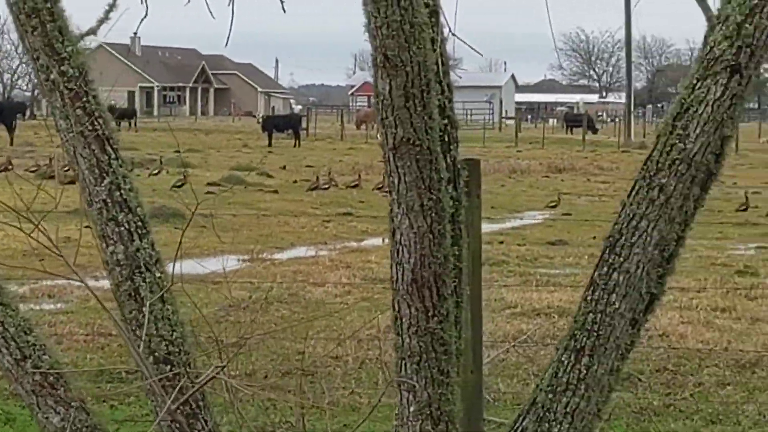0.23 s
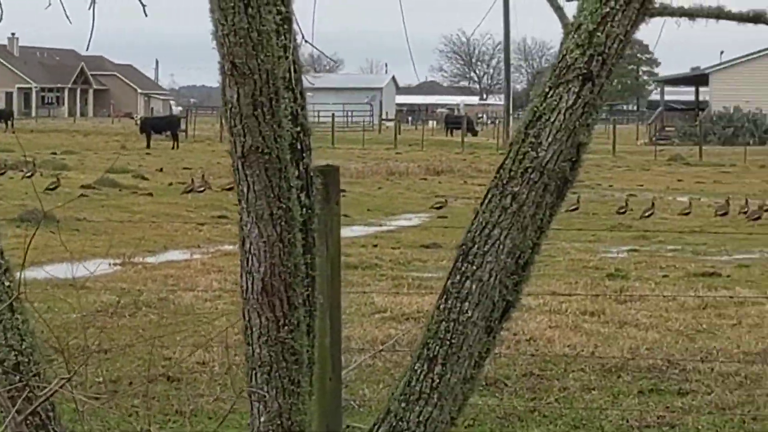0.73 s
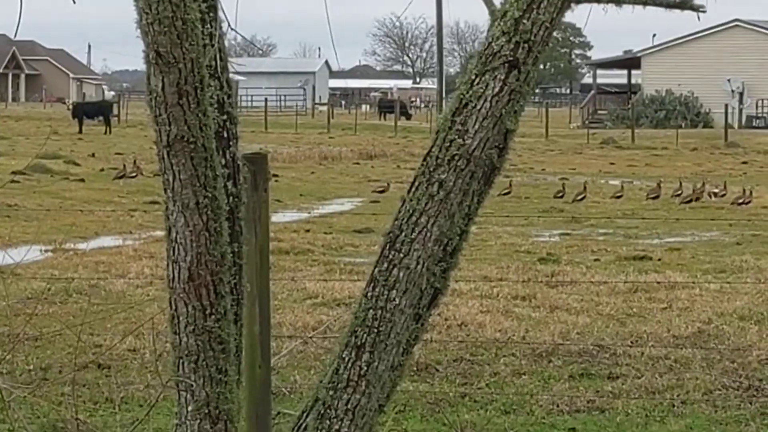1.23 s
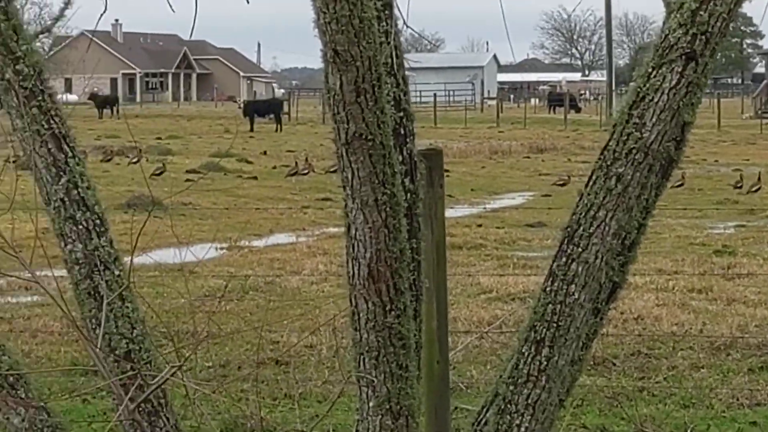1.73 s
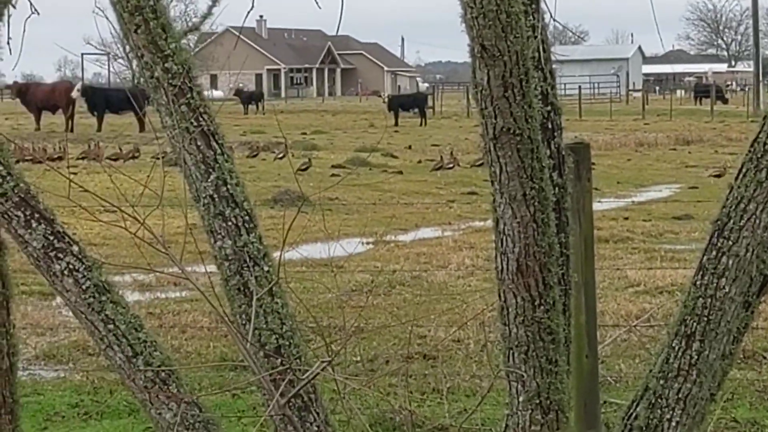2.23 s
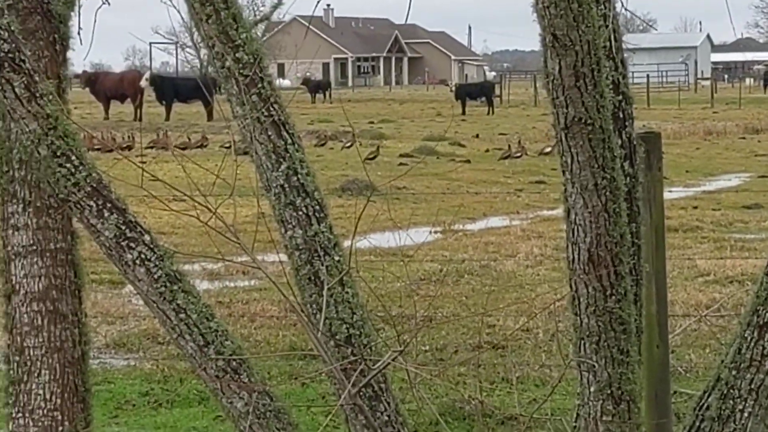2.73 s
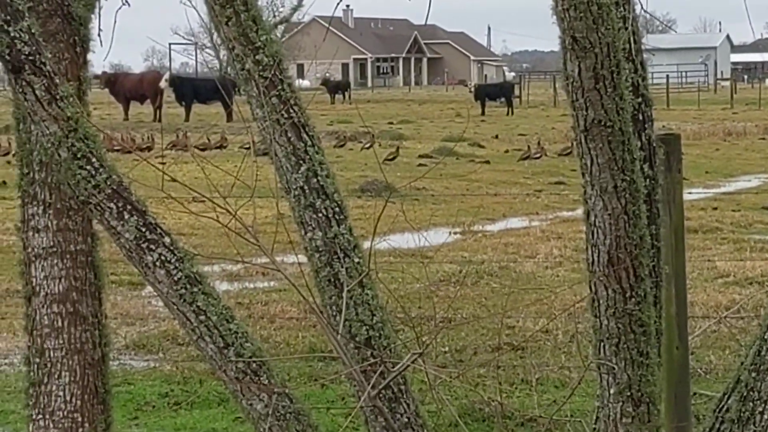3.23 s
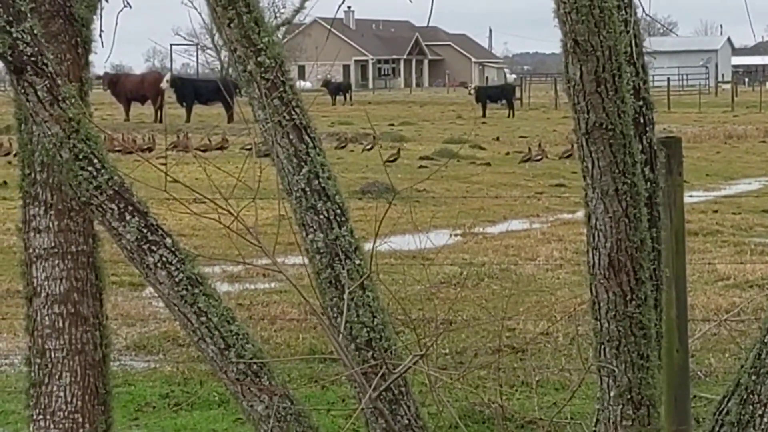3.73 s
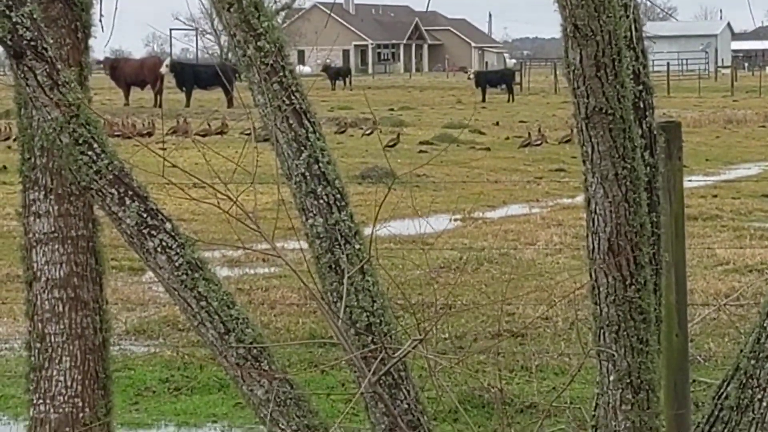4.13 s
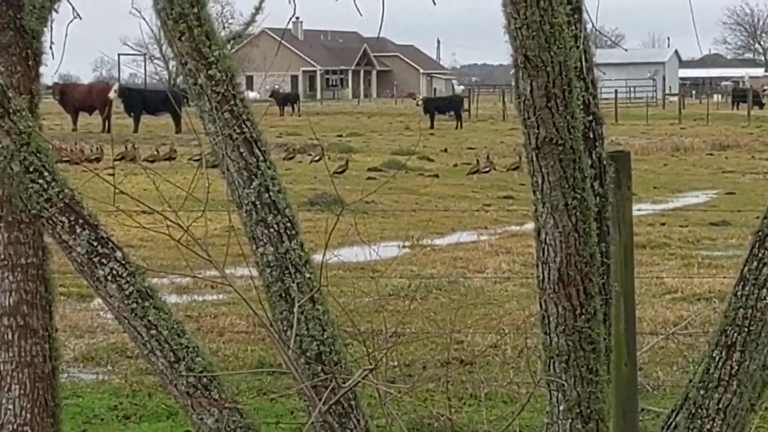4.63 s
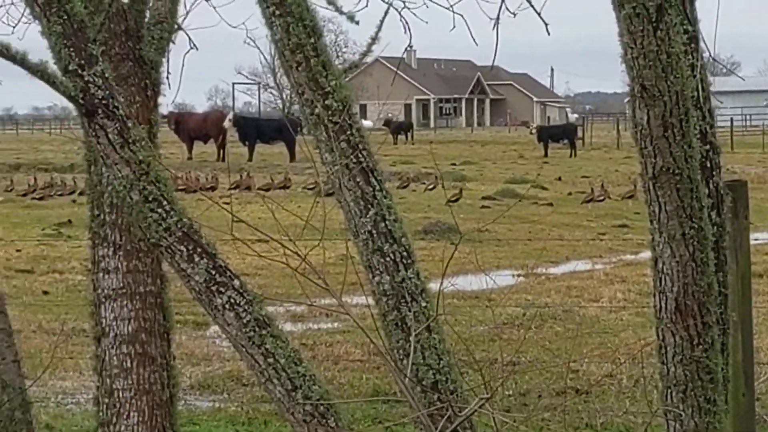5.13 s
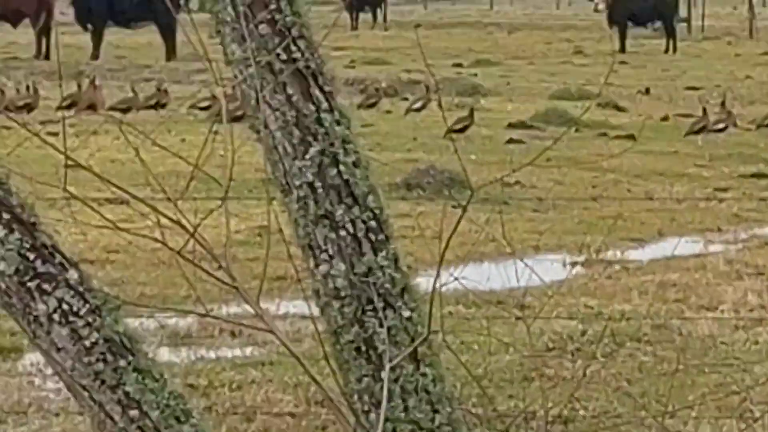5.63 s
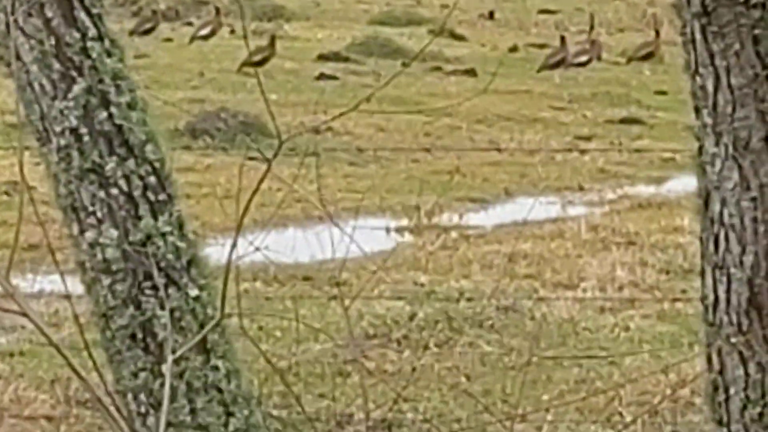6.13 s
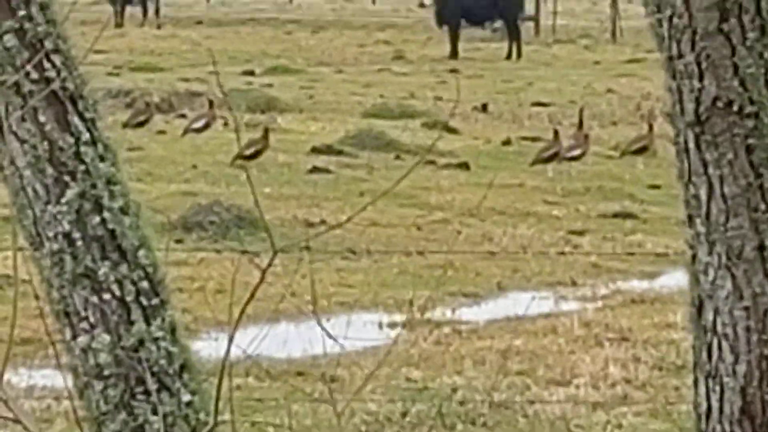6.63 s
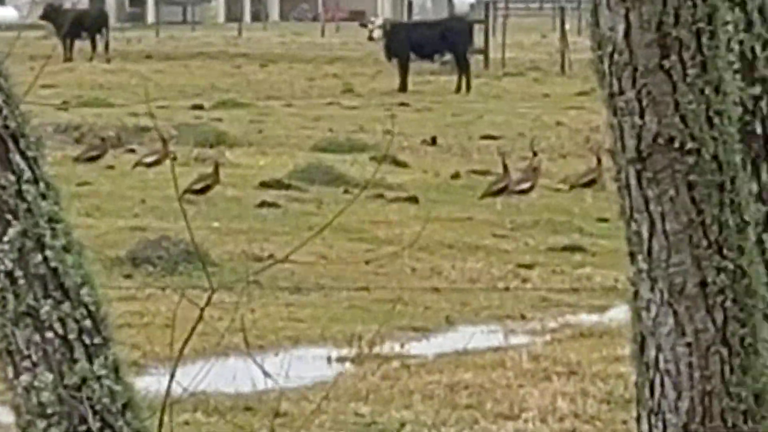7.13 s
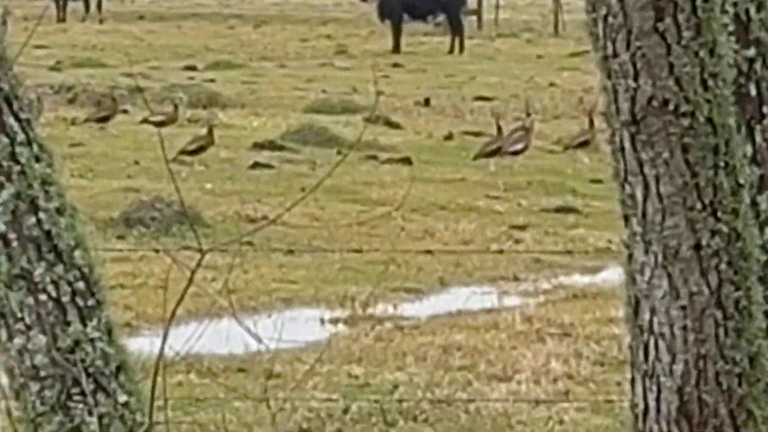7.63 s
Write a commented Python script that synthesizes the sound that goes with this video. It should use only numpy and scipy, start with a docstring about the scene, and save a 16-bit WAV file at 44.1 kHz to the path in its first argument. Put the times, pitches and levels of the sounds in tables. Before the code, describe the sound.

Small birds chirp, whistle and warble faintly across an open pasture, with a slight echo, while a cricket trills thin and high over a soft rumble and hum. A few small ticks sound close by in the first half second, and dry, leafy rustles follow on the right between about 1 and 3.5 seconds. From around 3.4 seconds wind begins to buffet the microphone, with low, uneven thumps on either side, strongest from 4.4 to 6.9 seconds. The cricket grows a little louder after 4 seconds, and distant ducks whistle among the scattered chirps. At about 6.6 seconds the calls start to crowd together and rise in level. From 7.5 seconds the flock bursts into alarm, many loud, shrill, wavering whistles overlapping above an airy rush of wings, lasting until the end at about 8 seconds.

```python
"""Small birds and whistling ducks call near and far across a wet pasture, heard through a hand-held camera.
Their notes are wavering tones that glide, arch, warble or sound two voices at once, and echo off trees
and sheds. A cricket trills with its wings, something rustles close on the right, and wind eddies thump
on the two microphone ports over a faint hum and rumble. At the end the flock raises the alarm:
many whistles at once over a rush of wings."""
import sys
import numpy as np
from scipy import signal
from scipy.fft import rfft, irfft, next_fast_len
from scipy.io import wavfile
from scipy.ndimage import map_coordinates

SR = 44100
rng = np.random.default_rng(int(sys.argv[2]) if len(sys.argv) > 2 else 0)


def unload_wav(signal):
    """Save mono or channel-first audio to the path in sys.argv[1] as 16-bit WAV at rate SR, clipped to [-1, 1]."""
    wavfile.write(
        sys.argv[1],
        SR,
        np.round(np.clip(np.atleast_2d(signal).T, -1, 1) * 32767).astype(np.int16),
    )


N = 348390
FLOCK_LAG_S, CHIRP_LAG_S = -0.000295, 0.00031  # left-port delay: flock on the left, chirper on the right


def amp(db):
    """Gain of a level in dB."""
    return 10 ** (np.asarray(db) / 20)


def unit(x):
    """Scaled to rms 1."""
    return x / np.sqrt(np.mean(x ** 2) + 1e-20)


def along(points, hz):
    """Read (frequency, value) breakpoints on a log frequency axis."""
    freqs, values = np.transpose(points)
    return np.interp(np.log(hz + 1), np.log(freqs + 1), values)


def automation(rows):
    """One fader curve, sample by sample, for each column after the time."""
    times, *columns = np.transpose(rows)
    return [np.interp(np.arange(N) / SR, times, column) for column in columns]


def wobble(rate):
    """Smooth random modulation, rate knots a second."""
    return map_coordinates(rng.standard_normal(int(N * rate / SR) + 4), [np.arange(N) * rate / SR])


def eq(x, response):
    """Shape x with a gain that depends on frequency."""
    size = next_fast_len(N + 8192)
    return irfft(rfft(x, size) * response(np.fft.rfftfreq(size, 1 / SR)), size)[..., :N]


def hiss(spectrum, shared, grain_db, rate=400):
    """Stereo noise of rms 1, partly common to both sides, lumpy by grain_db at rate lumps a second."""
    noise = np.sqrt(shared) * rng.standard_normal(N) + np.sqrt(1 - shared) * rng.standard_normal((2, N))
    lumps = amp(grain_db * np.array([wobble(rate), wobble(rate)]))
    return unit(eq(noise * lumps, lambda hz: amp(along(spectrum, hz))))


def pan(pan_db):
    """Constant-power gains; every pan is left minus right in dB, so positive is left."""
    turn = np.arctan(amp(-pan_db))
    return np.array([[np.cos(turn)], [np.sin(turn)]])


def bend(length, start, middle, end):
    """A parabola through three points, lasting length seconds."""
    u = np.linspace(-1, 1, round(length * SR))
    return middle + u * (end - start) / 2 + u * u * ((end + start) / 2 - middle)


def add_note(out, start, hz, db, pan_db, fade, harmonics_db=-60, lag_s=FLOCK_LAG_S, waver_hz=42):
    """Mix in a hoarse, wavering tone that follows hz; fade is the share of its length at each end."""
    u = np.linspace(0, 1, len(hz))
    envelope = np.sin(np.pi / 2 * np.clip(np.minimum(u, 1 - u) / fade, 0, 1))
    knots = rng.standard_normal((3, 64))
    t = np.arange(len(hz)) / SR
    jitter, flutter, waver = [np.interp(t * rate, np.arange(64), row)
                              for rate, row in zip((250, 250, 70), knots)]
    port_phase = (lag_s + 0.000015 * knots[1, 0]) * np.array([[-np.pi], [np.pi]]) * hz
    phase = 2 * np.pi * np.cumsum(hz + 50 * jitter + waver_hz * waver) / SR + 9 * knots[0, 0] + port_phase
    tone = np.sin(phase)
    if hz.max() < 6100:
        tone += amp(harmonics_db) * (np.sin(2 * phase) + 0.44 * np.sin(3 * phase))
    note = pan(pan_db) * amp(db + 3.5 * flutter) * envelope * tone
    slot = out[:, round(start * SR):][:, :len(hz)]
    slot += note[:, :slot.shape[1]]


# Reverb decay of the pasture: (frequency [Hz], time to fall 60 dB [s])
FIELD_DECAY = [(2000, 0.089), (5000, 0.49), (12000, 0.19)]


def echoes(x):
    """Reflections off trees and sheds: a noise tail in which each frequency dies at its own speed."""
    hz, t, bands = signal.stft(rng.standard_normal((2, SR // 2)), SR, nperseg=256)
    tail = signal.istft(bands * amp(-60 * t / along(FIELD_DECAY, hz)[:, None]), SR, nperseg=256)[1]
    return signal.fftconvolve(x, tail / np.linalg.norm(tail[0]), axes=1)[:, :N]


# Tone colour of the ambience bed: (frequency [Hz], level [dB])
AIR_SPECTRUM = [(15, -46), (30, -10), (75, 2), (135, -3), (260, -12.5), (750, -17), (1200, -22.5),
                (2400, -27.5), (3600, -16.5), (4300, -39), (5700, -15.5), (6760, -6.5), (8400, -29.5),
                (11600, -27.5), (13200, -16.5), (15600, -38)]
# Faders of the distant drone: (time [s], hum level [dB], midrange boost [dB])
DRONE_FADERS = [(0, -64.5, 3.5), (1.5, -69, 3.5), (3.2, -67.5, 1.5), (4.2, -75, 5.5), (7, -80, 6),
                (7.9, -75, 9.5)]


def air():
    """The open field: a faint low hum, and a bed of far rumble and hiss whose mids swell slowly."""
    hum_db, boost_db = automation(DRONE_FADERS)
    hum = amp(hum_db + 2.9 * wobble(39)) * np.sin(2 * np.pi * np.cumsum(140 + 5 * wobble(9.5)) / SR)
    bed = amp(-63.5 + 1.1 * wobble(9.2)) * hiss(AIR_SPECTRUM, shared=0.12, grain_db=2.0)
    mids = eq(bed, lambda hz: np.exp(-np.log((hz + 1) / 900) ** 2 / 3.1))
    return hum + bed + (amp(boost_db) - 1) * mids


# Breeze on the microphone ports: (time [s], left level [dB], right level [dB])
BREEZE_FADERS = [(0, -60.5, -61), (2.9, -64, -64), (3.2, -55, -57.5), (3.5, -47.5, -47), (3.95, -57, -48.5),
                 (4.1, -35.5, -46), (4.4, -48, -42), (5.0, -41, -36.5), (5.1, -46, -46), (5.2, -34.5, -47),
                 (5.55, -48.5, -46.5), (5.9, -48, -37), (6.15, -40, -38), (6.3, -49, -44.5),
                 (6.5, -41.5, -33.5), (6.9, -49.5, -40.5), (7.4, -46.5, -46.5), (7.9, -50.5, -40)]
# Sudden gusts: (centre time [s], length [s], peak level [dB], port [0 left, 1 right])
PORT_GUSTS = [(3.435, 0.026, -33, 0), (3.511, 0.021, -39.5, 0), (3.62, 0.04, -40, 0),
              (3.858, 0.072, -36, 1), (4.0, 0.066, -40, 1), (4.164, 0.041, -34.5, 0),
              (4.21, 0.076, -37.5, 1), (4.296, 0.21, -33, 0), (4.457, 0.056, -22.5, 1),
              (4.628, 0.092, -36.5, 0), (4.766, 0.095, -33.5, 0), (4.943, 0.061, -37, 0),
              (4.965, 0.13, -33.5, 1), (5.322, 0.033, -33, 0), (5.536, 0.18, -34.5, 0),
              (5.579, 0.085, -31, 1), (5.69, 0.092, -24, 1), (5.827, 0.071, -34, 0), (5.952, 0.11, -23, 1),
              (6.157, 0.03, -25, 1), (6.222, 0.033, -28.5, 1), (6.426, 0.028, -31, 0),
              (6.531, 0.062, -27, 1), (6.638, 0.042, -30.5, 1), (6.818, 0.2, -37, 1),
              (7.057, 0.058, -34, 1), (7.179, 0.021, -33, 1), (7.4, 0.023, -40.5, 0),
              (7.604, 0.077, -35, 1), (7.798, 0.041, -33, 1)]
# Tone colour of the buffeting: (frequency [Hz], level [dB])
BUFFET_SPECTRUM = [(15, -65), (25, -29), (82, 0.5), (115, 1.5), (223, -10), (320, -18.5), (450, -34),
                   (650, -46.5), (1000, -100)]


def wind():
    """Eddies thump on each port separately: an unsteady breeze and gusts, brighter when strong."""
    swing_db, gust_edge_db, gust_flatness = 2.5, 7.5, 2.5
    t = np.arange(N) / SR
    power = amp(np.array(automation(BREEZE_FADERS)) + swing_db * np.array([wobble(18), wobble(17)])) ** 2
    for centre, length, peak_db, port in PORT_GUSTS:
        span = slice(round((centre - length) * SR), round((centre + length) * SR))
        drop_db = gust_edge_db * np.abs(2 * (t[span] - centre) / length) ** gust_flatness
        power[int(port), span] += amp(peak_db - drop_db) ** 2
    db = 10 * np.log10(power)
    buffet = amp(db) * hiss(BUFFET_SPECTRUM, shared=0, grain_db=4.0, rate=45)
    expanded = buffet * amp(0.9 * (db + 29.5))
    mids = eq(expanded, lambda hz: hz ** 4 / (hz ** 4 + 200 ** 4) / (1 + (hz / 600) ** 8))
    lows = eq(buffet, lambda hz: 200 ** 4 / (hz ** 4 + 200 ** 4) * hz ** 2 / (hz ** 2 + 45 ** 2))
    return lows + mids


# How the two ports pull each pitch to one side: (frequency [Hz], pan [dB])
PORT_BIAS = [(2900, -8), (3900, -6.5), (5200, 5.5), (6700, 7.5), (9000, -2.5)]


def chorus(centre_hz, spread, slide, count, longest_s=0.0792, start=0, harmonics_db=-60, waver_hz=40):
    """Many birds at once: gliding or arching notes at random moments from start on, at rms 1."""
    out = np.zeros((2, N))
    for when, pitch, duration, arch, fall, softness, side in rng.random((count, 7)):
        hz = centre_hz * np.exp(spread * (2 * pitch - 1))
        length = 0.0201 + (longest_s - 0.02) * duration
        contour = bend(length, hz * (1 - slide * (1.4 * arch - 0.6)), hz, hz * (1 - slide * (fall - 0.2)))
        pan_db = along(PORT_BIAS, hz) + 8 * (side - 0.5)
        add_note(out, start + when * (N / SR - start), contour, -12 * softness, pan_db,
                 fade=0.4, harmonics_db=harmonics_db, waver_hz=waver_hz)
    return out / np.std(out[:, round(start * SR):])


# Faders of the background calls: (time [s], duck level [dB], songbird level [dB])
FLOCK_FADERS = [(0, -83, -51), (1.14, -92, -56.5), (1.6, -76, -50), (2.8, -75, -56), (3.87, -79.5, -108),
                (4.27, -61.5, -49), (4.5, -79.5, -67), (4.95, -63, -94), (5.3, -73.5, -53.5),
                (6.1, -62.5, -52), (6.4, -68, -57), (7.2, -59.5, -46), (7.9, -39.5, -49)]


def far_flock():
    """Distant ducks and songbirds, heard mostly through their echoes."""
    ducks_db, songbirds_db = automation(FLOCK_FADERS)
    calls = amp(ducks_db - 0.5) * chorus(3900, spread=0.24, slide=0.132, count=620)
    calls += amp(songbirds_db - 8.5) * chorus(6700, spread=0.1, slide=0.0646, count=450)
    return amp(-8) * calls + echoes(calls)


# Faders of the trill: (time [s], song level [dB], overtone level [dB])
CRICKET_FADERS = [(0, -59, -76), (2.2, -65, -76), (2.7, -56.5, -76), (3.8, -61.5, -96), (4.3, -50.5, -72.5),
                  (6.5, -51, -74), (7.9, -47.5, -70.5)]


def cricket():
    """Each wing stroke sounds a rising tone with its overtone; a fainter tone trails the stroke."""
    song_hz, trailing_hz, strokes_per_s = 6650, 12300, 45.751
    song_db, overtone_db = automation(CRICKET_FADERS)
    t = np.arange(N) / SR
    strokes = strokes_per_s * t + 0.29

    def gate(lag, duty):
        return np.clip(1.5 - 3 * np.abs((strokes - lag + 0.5) % 1 - 0.5) / duty, 0, 1)

    phase = 2 * np.pi * np.cumsum(song_hz + 70 * wobble(200) + 100 * np.sin(2 * np.pi * strokes)) / SR
    song = amp(song_db + 3.5 + 3 * wobble(40)) * gate(0, duty=0.58) * np.sin(phase)
    overtone = amp(3.5 * wobble(150)) * gate(0, duty=0.45) * np.sin(2 * phase)
    trailing = amp(-6 + 2.3 * wobble(40)) * gate(0.28, duty=0.31) * np.sin(2 * np.pi * trailing_hz * t)
    return pan(11) * song + pan(-12) * amp(overtone_db + 11) * (overtone + trailing)


# Dry scrapes: (time [s], length [s], level [dB], dull layer amount [0-1])
SCRAPES = [(0.007, 0.7, -69, 0.17), (1.122, 0.16, -61, 0.16), (1.238, 0.19, -70, 0.05),
           (1.432, 0.13, -53.5, 0.18), (1.543, 0.2, -53.5, 0.27), (1.721, 0.15, -50, 0.2),
           (1.807, 0.41, -66, 0.32), (2.044, 0.36, -66.5, 0.2), (2.587, 0.16, -55.5, 0.08),
           (3.392, 0.11, -61.5, 0.2), (3.493, 0.09, -61, 0.13), (4.217, 0.1, -67.5, 1),
           (4.38, 0.14, -72.5, 0.7), (6.545, 0.065, -72, 1)]
# Tone colour of their crisp, leafy layer: (frequency [Hz], level [dB])
CRISP_SPECTRUM = [(530, -43), (900, -49), (1580, -14), (2230, -23), (4450, -7), (4950, -1), (6840, 5),
                  (9550, 5.5), (15600, -6)]
# Close ticks: (time [s], level [dB], pan [dB])
CLOSE_TICKS = [(0.073, -59, -2), (0.091, -51, 9), (0.245, -70, -11.0), (0.3735, -59, 4), (0.4075, -69, -4),
               (0.4283, -60, 4), (0.4394, -77, -6), (2.0308, -72, -10.5), (2.0872, -65, -16.0),
               (2.278, -63, -9), (3.0923, -65, -10), (3.9699, -66, 18), (5.6181, -63, -3)]


def rustle():
    """Dry scraping near the right port: swells of crisp and dull noise, dotted with single ticks."""
    crisp, dull, t = np.zeros(N), np.zeros(N), np.arange(N) / SR
    attack, release = 0.28, 0.41  # shares of a scrape's length
    for start, length, db, dullness in SCRAPES:
        ramps = np.minimum((t - start) / attack, (start + length - t) / release) / length
        envelope = amp(db + 5.5) * np.clip(ramps, 0, 1)
        crisp += envelope
        dull += envelope * dullness
    dull_spectrum = [(900, -21.5), (2200, -5.5), (4500, -8.0), (8000, -6.5), (15000, -70)]
    out = crisp * hiss(CRISP_SPECTRUM, shared=0.18, grain_db=1.5)
    out += amp(3.5) * dull * hiss(dull_spectrum, shared=0.46, grain_db=1.5)
    out *= pan(-8)
    decay_db = -60 * t[:SR // 100] / 0.016
    for start, db, pan_db in CLOSE_TICKS:
        tick = np.diff(rng.standard_normal(len(decay_db) + 1)) * amp(db + 12.5 + decay_db)
        out[:, round(start * SR):][:, :len(tick)] += pan(pan_db) * tick
    return np.array([np.roll(out[0], shift=16), out[1]])  # reaches the left port later


# Whistled notes: (time [s], length [s], start pitch [Hz], end pitch [Hz], level [dB], pan [dB])
WHISTLE_NOTES = [(0.033, 0.18, 6360, 6780, -51, 4), (0.236, 0.095, 7210, 7660, -52.5, -2),
                 (0.35, 0.18, 6100, 6070, -67, 5.5), (0.54, 0.193, 7600, 7460, -69, -5),
                 (0.68, 0.14, 7360, 7580, -55, -8), (0.721, 0.124, 6690, 6580, -55.5, 4),
                 (0.786, 0.017, 7350, 7820, -46, -4), (0.801, 0.018, 7750, 6600, -47, -2),
                 (1.061, 0.07, 6860, 6500, -56.5, 0), (1.115, 0.11, 6640, 6930, -50.5, 2.5),
                 (1.288, 0.11, 7740, 8230, -62.5, -1), (1.968, 0.02, 3740, 3500, -59.5, -4),
                 (2.024, 0.047, 4660, 3740, -60, -3), (2.045, 0.03, 6400, 4700, -53, -1),
                 (2.382, 0.022, 4730, 5460, -62.5, 0), (2.883, 0.02, 4450, 3530, -68, -6),
                 (2.159, 0.07, 6800, 7080, -46.5, -3), (2.396, 0.033, 3300, 3305, -61, -8),
                 (2.598, 0.14, 7490, 7170, -53.5, 2), (2.786, 0.1, 6000, 6420, -59.5, 2),
                 (3.04, 0.013, 5950, 4440, -56, 7), (3.121, 0.0865, 6720, 6940, -52.5, -1.5),
                 (3.32, 0.16, 6950, 7500, -57, 8), (3.243, 0.134, 5800, 5690, -62.5, 1.5),
                 (3.429, 0.103, 6130, 6390, -58, 1), (3.59, 0.14, 10800, 7800, -76, -2),
                 (4.124, 0.0654, 4120, 4500, -59.5, -7), (4.127, 0.101, 6970, 7086, -46.5, 2),
                 (4.46, 0.05, 6140, 6500, -54, 3.5), (4.486, 0.027, 5900, 5000, -65, 5),
                 (4.348, 0.029, 3970, 4070, -62, -3), (4.559, 0.0154, 4330, 3400, -62, -5),
                 (4.698, 0.0117, 3520, 5000, -62, -3), (3.79, 0.0344, 4080, 3280, -67, -8),
                 (3.969, 0.037, 4420, 4190, -64, -3), (5.915, 0.02, 5450, 4540, -56, 3),
                 (6.32, 0.012, 3230, 2900, -60, -4), (0.699, 0.04, 3580, 3505, -66.5, 2),
                 (4.901, 0.1, 4100, 3580, -61, -8), (4.86, 0.25, 3247, 3130, -65.5, -7),
                 (5.12, 0.32, 3190, 3204, -67.5, -5), (5.368, 0.15, 3270, 3140, -66.5, -5),
                 (5.951, 0.26, 3570, 3500, -69, -9), (6.205, 0.174, 3560, 3460, -67, -10.5),
                 (3.847, 0.029, 4050, 3400, -66, -6), (5.924, 0.064, 8960, 8300, -76, 0),
                 (6.631, 0.052, 4960, 3250, -60.5, -5), (5.027, 0.0081, 3300, 3010, -50.5, -5),
                 (6.76, 0.0208, 6100, 7300, -45, 11), (5.101, 0.15, 7550, 6010, -56, 11),
                 (5.179, 0.024, 7830, 8430, -51.5, 5), (5.182, 0.11, 6210, 6370, -64, 10),
                 (5.26, 0.051, 5760, 6730, -53, 7), (5.3, 0.1, 7100, 8000, -62, 9),
                 (5.525, 0.061, 4160, 4120, -62, -6), (5.657, 0.1, 3990, 4220, -60, -20),
                 (5.945, 0.058, 4300, 4120, -60.5, -25), (6.009, 0.024, 6100, 7180, -40, 7),
                 (6.595, 0.175, 7320, 7380, -59, 6.5), (6.675, 0.018, 5700, 7150, -44, 6),
                 (6.74, 0.043, 5700, 5300, -48, 7), (6.736, 0.038, 3900, 3600, -54.5, -5),
                 (6.935, 0.025, 5000, 3500, -57, -4), (7.037, 0.021, 4600, 3080, -58, -6),
                 (7.083, 0.04, 2450, 1850, -66, -11), (7.18, 0.0304, 2700, 2100, -63.5, -8),
                 (7.204, 0.033, 2620, 2200, -64.5, -6), (7.2, 0.026, 6800, 5500, -52, 5),
                 (7.392, 0.036, 6800, 5000, -51, 13), (7.655, 0.026, 4250, 4230, -33.5, -1),
                 (7.82, 0.06, 3270, 3150, -49, -7), (6.939, 0.02, 7300, 4730, -49, 17),
                 (6.989, 0.0424, 7000, 6480, -49.5, 12.5), (7.011, 0.011, 5800, 4850, -38.5, 6),
                 (7.032, 0.026, 4790, 4820, -49, -11), (7.1, 0.04, 4740, 3300, -56, -3),
                 (7.101, 0.13, 6960, 7290, -45, 8), (7.108, 0.058, 6600, 3550, -47.5, 1),
                 (7.211, 0.054, 5250, 3320, -47.5, -6), (7.214, 0.154, 6990, 7330, -49.5, 10),
                 (7.143, 0.056, 4570, 2970, -63, -8), (7.242, 0.046, 4330, 2750, -59, 5),
                 (7.323, 0.033, 5200, 3600, -45, -1), (7.277, 0.044, 2530, 3600, -54, -6),
                 (7.322, 0.039, 3470, 3233, -41, -12), (7.403, 0.021, 4420, 4100, -44, 2),
                 (7.423, 0.021, 3280, 3310, -50, -11.5), (7.457, 0.025, 3236, 3190, -35.5, -13),
                 (7.495, 0.058, 2827, 3436, -39, -11), (7.44, 0.071, 3680, 4450, -45, -7),
                 (7.702, 0.028, 4300, 4020, -34, -5), (7.793, 0.21, 5320, 5380, -36, -4),
                 (7.834, 0.06, 6600, 6160, -47.5, -6.5), (7.49, 0.058, 4300, 4770, -40.5, -10),
                 (7.554, 0.11, 3840, 4445, -30, -5), (7.562, 0.12, 1870, 1940, -60, -6),
                 (7.567, 0.083, 5520, 6030, -37.5, 30), (7.59, 0.11, 3000, 2920, -48, -13),
                 (7.619, 0.0565, 3810, 4020, -33.5, -5), (7.639, 0.051, 6000, 5550, -42, 19),
                 (7.65, 0.044, 9770, 9100, -50, -6), (7.711, 0.044, 4570, 4530, -32, 3),
                 (7.749, 0.036, 2370, 2700, -63, 0), (7.772, 0.0957, 2825, 2560, -46.5, -1),
                 (7.777, 0.049, 3016, 3860, -48.5, -11), (7.79, 0.03, 5460, 9860, -45, -14),
                 (7.819, 0.069, 3830, 5040, -29.5, 1.5), (7.839, 0.017, 2050, 2050, -41.5, 9),
                 (7.85, 0.048, 5040, 5440, -34, 7.5), (7.872, 0.046, 7450, 7270, -38, 5)]


def whistles():
    """Birds whistle even glides: faint, far ones arrive mostly as echo, loud ones mostly direct."""
    far_db, near_db = -78, -51
    out, send = np.zeros((2, 2, N))
    for start, length, start_hz, end_hz, db, pan_db in WHISTLE_NOTES:
        hz = np.linspace(start_hz, end_hz, round(length * SR))
        direct = np.clip((db - far_db) / (near_db - far_db), 0.1, 0.99)
        add_note(out, start, hz, db + 6.5 + 20 * np.log10(direct), pan_db, fade=0.22, harmonics_db=-20)
        add_note(send, start, hz, db + 3.5 + 10 * np.log10(1 - direct ** 2), pan_db, fade=0.13)
    return out + echoes(send)


# Two-voiced chirps: (time [s], length [s], low voice [Hz], high voice [Hz], level [dB],
# pan on top of the port bias [dB], tilt [dB/kHz])
CHIRP_NOTES = [(0.278, 0.044, 2770, 3830, -53, -0.5, -0.5), (0.855, 0.046, 2810, 3950, -53.5, 0, 0),
               (1.487, 0.047, 2766, 3940, -50, 3, 0), (2.12, 0.052, 2824, 4220, -48, -2, 0.5),
               (4.801, 0.051, 2790, 4170, -51.5, 2, 0), (5.497, 0.048, 2840, 4020, -54, 2, 1),
               (6.045, 0.046, 2740, 3700, -60.5, 7, 0), (7.281, 0.062, 2710, 3580, -48.5, 2, -1)]
# Partials of a chirp: (low voice multiple [-], high voice multiple [-], level [dB])
CHIRP_PARTIALS = [(1, 0, -18), (0, 1, -11), (-1, 2, -21), (2, 0, 0), (1, 1, -3), (0, 2, -14), (3, 0, -14),
                  (-1, 3, -14), (2, 1, -18), (1, 2, -17), (4, 0, -16)]


def chirps():
    """Both halves of a bird's syrinx sound at once and mix into sum and difference tones."""
    out = np.zeros((2, N))
    for start, length, low_hz, high_hz, db, pan_db, tilt in CHIRP_NOTES:
        low = low_hz * bend(length, 0.88, 1, 0.82)
        high = high_hz * bend(length, 0.82, 0.97, 0.83)
        for n_low, n_high, partial_db in CHIRP_PARTIALS:
            partial_hz = n_low * low_hz + n_high * high_hz
            level_db = db + 10.5 + partial_db + tilt * (partial_hz - 6000) / 1000
            add_note(out, start, n_low * low + n_high * high, level_db,
                     pan_db + along(PORT_BIAS, partial_hz), fade=0.35, lag_s=CHIRP_LAG_S)
    return out


# Warbled notes: (time [s], length [s], pitch [Hz], vibrato depth [Hz], vibrato rate [Hz],
# level [dB], pan [dB])
WARBLE_NOTES = [(0.311, 0.21, 7210, 890, 33, -51.5, -4), (2.462, 0.17, 7920, 150, 47, -49.5, -5),
                (5.262, 0.2, 6710, 190, 25.5, -47.5, 14), (6.77, 0.27, 6740, 747, 29.5, -46.5, 8),
                (7.459, 0.11, 6220, 930, 49, -38, 10)]


def warbles():
    """High bird notes with a fast vibrato."""
    out = np.zeros((2, N))
    for start, length, hz, depth_hz, rate, db, pan_db in WARBLE_NOTES:
        vibrato = depth_hz * np.cos(2 * np.pi * rate * np.arange(round(length * SR)) / SR)
        add_note(out, start, hz - vibrato, db + 1.5, pan_db, fade=0.051)
    return out


# Arched peeps: (time [s], length [s], top pitch [Hz], arch depth [0-1], level [dB], pan [dB])
PEEP_NOTES = [(0.489, 0.024, 8030, 0.17, -53, -17), (1.906, 0.011, 5600, 0.1, -49, -2),
              (2.179, 0.0095, 5880, 0.32, -39, -1), (2.843, 0.05, 4670, 0.07, -66, -2),
              (3.195, 0.042, 4650, 0.04, -58, -4), (3.308, 0.073, 5550, 0.4, -58, 6),
              (3.321, 0.044, 3470, 0.09, -64.5, -7), (4.657, 0.034, 8460, 0.05, -57.5, 3),
              (5.052, 0.14, 8460, 0.07, -62.5, -3), (5.3, 0.042, 7000, 0.23, -66, 2),
              (6.203, 0.072, 4220, 0.06, -56.5, -7), (6.285, 0.028, 4340, 0, -64, -15),
              (6.51, 0.033, 5400, .05, -56, 9), (6.686, 0.043, 4300, 0.17, -44, -1),
              (6.77, 0.034, 4200, 0.26, -47, -4), (6.81, 0.03, 5650, 0.2, -49, 7),
              (6.861, 0.033, 3550, 0.1, -50.5, -13), (6.957, 0.046, 3890, 0.26, -49, -6),
              (7.183, 0.033, 5080, 0.17, -42, 4.5), (7.282, 0.064, 3823, 0.13, -36, -12),
              (7.522, 0.063, 6860, 0.14, -41, 6.5), (7.532, 0.051, 5240, 0.07, -36, 7),
              (7.534, 0.058, 9800, 0.04, -51.5, -10), (7.683, 0.037, 5550, 0.1, -38.5, 11),
              (7.854, 0.05, 9800, 0.04, -46.5, -13.5)]


def peeps():
    """Short bird notes whose pitch arches up and over."""
    out = np.zeros((2, N))
    for start, length, top_hz, depth, db, pan_db in PEEP_NOTES:
        hz = top_hz * (1 - depth * bend(length, start=1.3, middle=0, end=0.886))
        add_note(out, start, hz, db + 7.5, pan_db, fade=0.34, harmonics_db=-23.5)
    return out


# Wind hits on the ports: (time [s], level [dB], pan [dB])
EDDY_HITS = [(1.11, -49, -7), (1.268, -49.5, -6), (3.434, -50, 17), (4.163, -29, 10), (4.449, -27.5, -26),
             (4.953, -28, -28), (5.017, -32.5, -16), (5.315, -25.5, 29), (5.668, -19.5, -35),
             (5.708, -21, -26), (5.922, -28, -25.5), (5.986, -39, -19.0), (6.156, -27, -19),
             (6.224, -32, -15), (6.516, -19, -27), (6.555, -35, -10), (6.617, -25, -28), (6.852, -28, -19),
             (7.176, -41, -6)]


def wind_slaps():
    """A single eddy bursts on a port: a swing or so of pressure, over at once."""
    centre_hz, half_length_s = 169, 0.0037
    out, t = np.zeros((2, N)), np.arange(-600, 600) / SR
    for time, db, pan_db in EDDY_HITS:
        pitch, phase = rng.random(2)
        hz = centre_hz * (0.8 + 0.4 * pitch)
        swing = np.exp(-(t / half_length_s) ** 2) * np.sin(2 * np.pi * (hz * t + phase))
        out[:, round(time * SR) - len(t) // 3:][:, :len(t)] += 2 * amp(db) * pan(pan_db) * swing
    return eq(out, lambda hz: hz ** 2 / (hz ** 2 + 70 ** 2))


# Faders of the flock's alarm: (time [s], wing level [dB], call level [dB])
TAKEOFF_FADERS = [(6.55, -80.5, -78), (6.75, -72, -64.5), (7, -70, -64.5), (7.3, -59, -60.5),
                  (7.43, -62, -62), (7.5, -53, -48), (7.6, -41.5, -40.5), (7.73, -52, -43.5),
                  (7.82, -44, -35.5), (7.9, -48, -38.5)]
# Tone colour of the wing rush: (frequency [Hz], level [dB])
FEATHER_SPECTRUM = [(820, -77), (1400, -58), (1950, -11), (2290, -35), (3950, -12.5), (8590, -16),
                    (9600, -18), (13700, -30), (15600, -51)]


def takeoff():
    """Feathers rush through air as the birds spring up, all calling in wavering whistles."""
    wings_db, alarm_db = automation(TAKEOFF_FADERS)
    alarm = amp(alarm_db + 2.5) * chorus(3900, spread=0.65, slide=0.2, count=190, longest_s=0.11,
                                         start=6.6, harmonics_db=-9, waver_hz=90)
    reverb = amp(-10) * echoes(alarm)
    left, right = pan(-3.5) * amp(wings_db + 8) * hiss(FEATHER_SPECTRUM, shared=0.35, grain_db=2.5)
    wings = np.array([np.roll(left, round(FLOCK_LAG_S * SR)), right])
    return wings + alarm + reverb


def scene():
    """The full mix, with a light reverb send on the nearer birds."""
    near = whistles() + chirps() + warbles() + peeps()
    birds = near + amp(-10) * echoes(near) + far_flock()
    return birds + cricket() + rustle() + takeoff() + wind() + wind_slaps() + air()


def record(dry):
    """The hand shades the left port from the top treble; the camera keeps nothing above its band limit."""
    shelf_db, shelf_hz, limit_hz = np.array([[-4], [1.5]]), 8200, 15730
    return eq(dry, lambda hz: amp(shelf_db / (1 + (shelf_hz / (hz + 1)) ** 8)) * (hz < limit_hz))


dry = scene()
out = record(dry)
unload_wav(out)
```